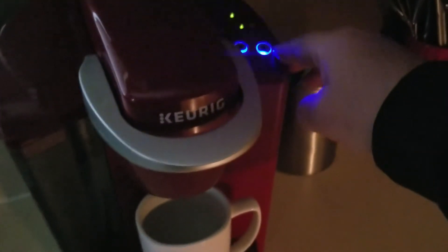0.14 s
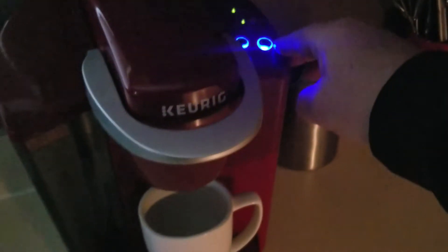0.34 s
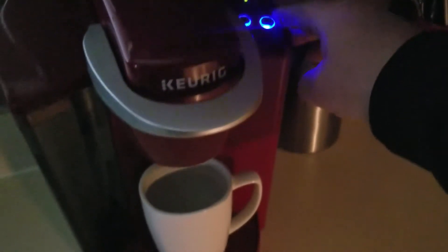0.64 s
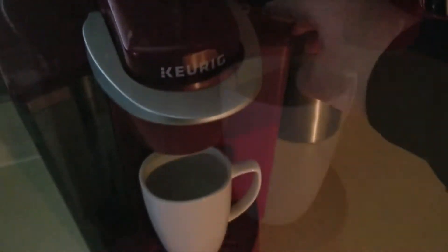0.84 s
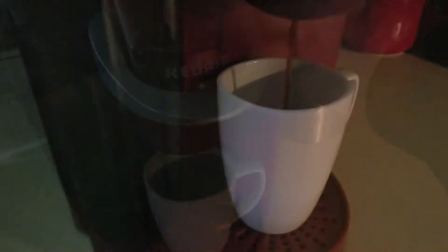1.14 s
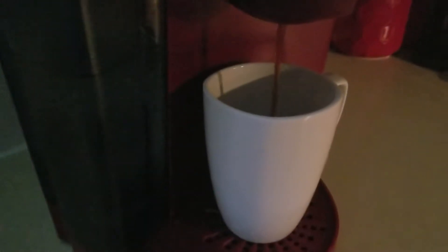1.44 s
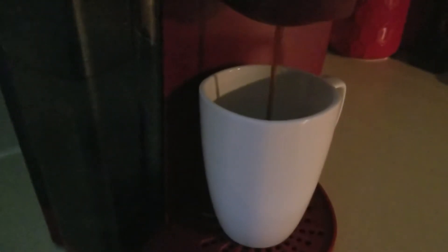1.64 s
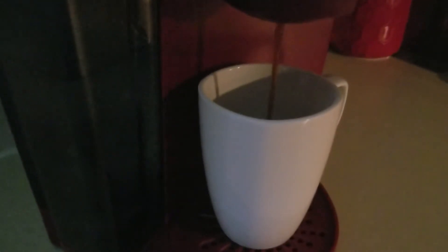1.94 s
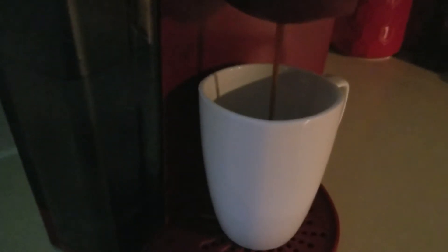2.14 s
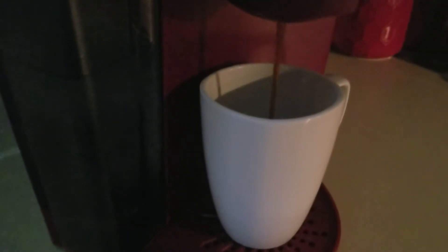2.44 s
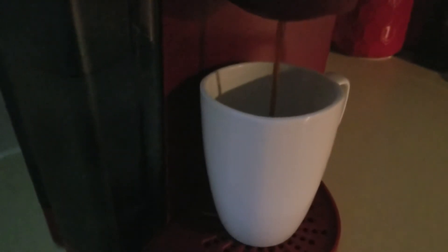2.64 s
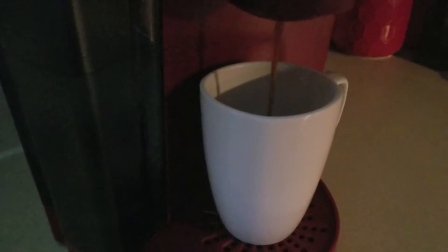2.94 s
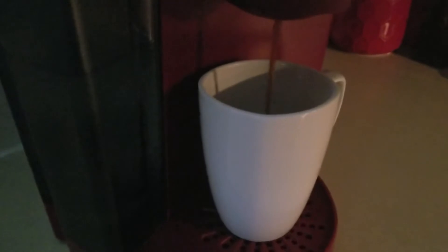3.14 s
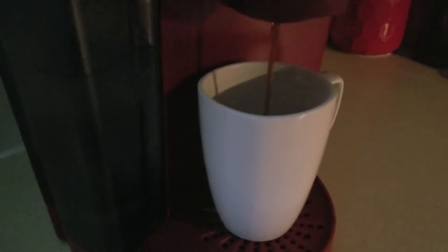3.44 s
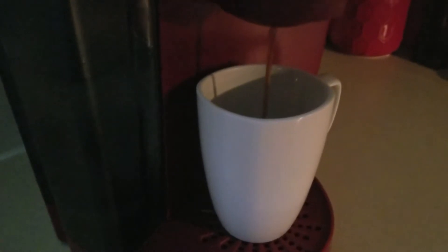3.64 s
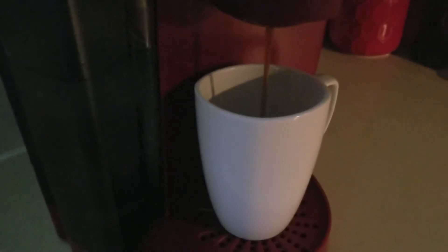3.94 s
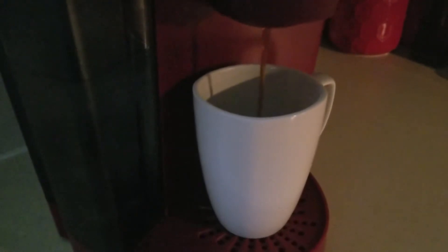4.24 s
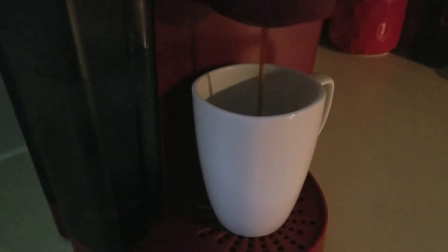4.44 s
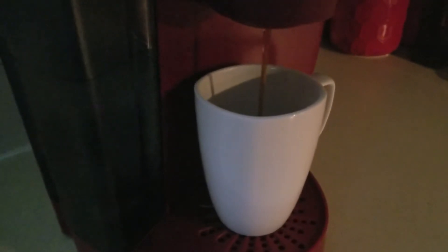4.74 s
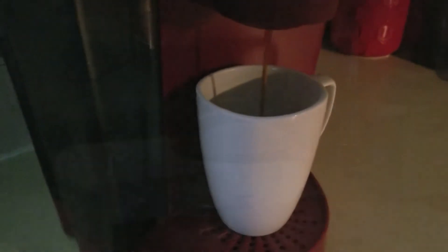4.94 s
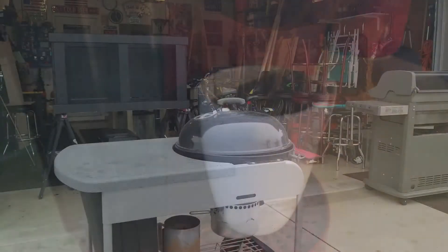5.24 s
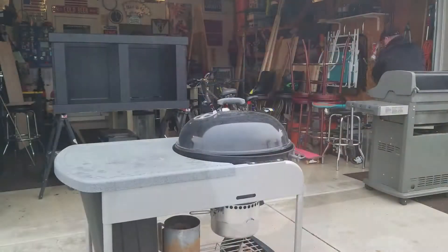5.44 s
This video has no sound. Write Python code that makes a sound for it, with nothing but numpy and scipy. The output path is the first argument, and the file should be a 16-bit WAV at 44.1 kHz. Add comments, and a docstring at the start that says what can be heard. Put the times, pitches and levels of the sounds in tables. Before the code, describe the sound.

Quiet room rumble and faint electrical hum come first. Then a buzzy pump drone fades in with a close, wet trickle, hollow bubbles and crisp irregular drops in a mug. The stereo pickup has short kitchen reflections. After five seconds everything thins out into outdoor air, a tiny bird-like twitter and a muffled bump.

```python
"""A thin stream of coffee fills a ceramic mug: splash noise, ringing air bubbles and drops ticking on the mug.
The coffee maker's pump is random knocks through casing resonances, plus a wandering sine drone.
Behind them lie low room rumble and hum, made of shaped noise and sines, heard by two close microphones.
At the end the pour fades and open air swells in, with a faint high twitter and a soft low bump."""
import sys
import numpy as np
from scipy import signal
from scipy.fft import rfft, irfft
from scipy.io import wavfile
from scipy.ndimage import uniform_filter1d

SR = 44100
rng = np.random.default_rng(int(sys.argv[2]) if len(sys.argv) > 2 else 0)


def write(x):
    x = np.atleast_2d(x).T
    wavfile.write(sys.argv[1], SR, np.round(np.clip(x, -1, 1) * 32767).astype(np.int16))


N = 246959
T = np.arange(N) / SR  # time of every sample, in seconds

# Kitchen background, shape only: pitch_hz, relative_level_db (per Hz)
KITCHEN_SPECTRUM = [(20, -38), (33, -15), (48, -8.5), (62, -6), (80, -16.5), (112, -12), (165, -28.5),
                    (238, -17), (300, -39.5), (400, -39), (750, -44.5), (1100, -49.5), (6000, -54),
                    (16000, -53)]
# Steady kitchen hum: pitch_hz, level_db
KITCHEN_HUM = [(59.4, -63), (296.5, -77.5), (855, -90.5)]
KITCHEN_NOISE_DB, KITCHEN_T60_S = -59.5, .31  # noise level; time for echoes to fall 60 dB
# Open air, shape only: pitch_hz, relative_level_db (per Hz)
OPEN_AIR_SPECTRUM = [(20, -32), (50, -27), (90, 7), (200, -13), (400, -20), (1000, -30), (2600, -42),
                     (4000, -28.5), (8000, -40.5), (16000, -73)]
# Swell of the open air: time_s, level_db
OPEN_AIR_SWELL = [(4.9, -100), (5.2, -57), (5.51, -55.5), (5.565, -49.5), (5.6, -38.5)]

# Pump level, which fades in, dips briefly near 2.4 and 4.1 s, and fades out: time_s, relative_level_db
PUMP_LEVEL = [(0.87, -57.5), (1.14, -49), (1.18, -40), (2.34, -39), (2.36, -45.5), (2.48, -40),
              (2.98, -38.5), (3.29, -35.5), (3.33, -36.5), (4.06, -38.5), (4.11, -45.5), (4.15, -37),
              (5.19, -40.5), (5.43, -51), (5.54, -68)]
# Casing resonances: pitch_hz, width_hz (before scaling in pump), relative_level_db
CASING_RESONANCES = [(52.3, 20, -16), (104, 7, -3), (147.3, 10, -11), (212, 23, -7), (239, 19, -2.5),
                     (293, 41, -4.5), (306.3, 3.8, 5.5), (373.7, 23.4, -11.5), (492.4, 48, -18.5),
                     (604.4, 49, -14)]
# The pump throbs with its uneven strokes, and its level flutters at random
STROKES_PER_S, STROKE_DB = 10.3, 1.5
FLUTTER_STEPS_PER_S, FLUTTER_DB = 8.834, 2.9

# The stream hitting the coffee: time_s, flow_db (relative), fine_spray_db (relative to the flow)
POUR_FLOW = [(0.84, -73, -11), (0.89, -68.5, -1), (1.02, -58.5, 1), (1.17, -52.5, 1), (1.26, -50, -3),
             (1.4, -49.5, -0.5), (1.93, -48.5, -1.5), (2.38, -47, -0.5), (2.73, -48, -3.5), (3.81, -47, -7),
             (4.9, -49, -1.5), (5.16, -53.5, -4.5), (5.35, -60, 0.5), (5.52, -70.5, -4)]
# Splash heard from the mug's mouth, shape only: pitch_hz, relative_level_db
SPLASH_SPECTRUM = [(430, -11), (680, -9.5), (860, 0.5), (1250, -0.5), (1650, -9), (2300, -5.5), (3200, -5),
                   (4500, -12), (5200, -15), (6800, -9), (7700, -20), (8800, -26.5), (9700, -18.5),
                   (16000, -24)]
# Loud drops on the mug: start_s, relative_peak_db, treble_db (relative), low_ring_db (relative)
LOUD_DROPS = [(0.8365, -47.5, -3, -6), (0.9502, -34.5, -14, -11), (1.035, -33.5, -7, -18),
              (1.1583, -26, -17, -34), (1.244, -29, -29, -8), (1.3039, -26.5, -15, -14),
              (1.3812, -31, -16, -9), (1.4281, -22.5, -15, -10), (1.577, -28, -3, -6),
              (1.6258, -18.5, -2.5, -23), (1.706, -24.5, -6, -6), (1.7965, -20.5, -5.5, -7),
              (1.8736, -19, -16, -6.5), (2.0216, -30, -4, -18), (2.0646, -20.5, -2.5, -25),
              (2.248, -17, 7, -10), (2.269, -25, -19, -4), (2.2882, -28, -11, -16), (2.4624, -26, -7, -20),
              (2.8464, -24, -11, -29), (3.1057, -14, -7, -14.5), (3.2168, -24.5, -13, -20),
              (3.245, -22, -29, -28), (3.26, -19, -24, -17.5), (3.471, -25, -18, 0),
              (3.5816, -29.5, -24, -17), (3.7313, -23.5, -21, -18), (3.8092, -29.5, -34, -30),
              (3.9903, -29.5, -5, -1), (4.0423, -21.5, -18, -1), (4.7212, -29.5, -8, -29),
              (4.7865, -29, -10, -22), (5.014, -30.5, -12, -32), (5.24, -29, -1, -32)]
# What a drop rings with, before small random changes: pitch_hz, t60_s, relative_level_db
MUG_MODES = [(2630, 0.055, -3.5), (3102, 0.065, -8.5), (4083, 0.017, 9), (4480, 0.024, 15),
             (6460, 0.088, -11), (6656, 0.018, 4), (6983, 0.037, -3), (6930, 0.0067, -6),
             (9910, 0.0057, 13.5), (10550, 0.0051, 7), (11870, 0.03, -8.5), (12310, 0.013, 2.5),
             (12100, 0.0065, -10), (15000, 0.0035, -24)]
# Gulps of air trapped by the stream: start_s, relative_peak_db, pitch_hz (nominal), upper_ring_db (relative)
AIR_GULPS = [(0.954, -43.5, 820, -12), (1.017, -32.5, 790, -26), (1.038, -34.5, 890, -29),
             (1.06, -27.5, 880, -31), (1.092, -33, 1320, -13), (1.113, -39, 910, 8.5),
             (1.194, -28, 1035, -14), (1.268, -25.5, 1100, -18), (1.399, -30.5, 920, -12),
             (1.427, -28, 1070, -18), (1.439, -29, 840, -17), (1.546, -29.5, 856, -12),
             (1.578, -28, 977, -8), (1.627, -22, 1040, -14), (1.753, -30.5, 886, -24),
             (1.798, -20.5, 951, -18), (1.829, -23.5, 1114, -19), (1.875, -34, 1210, -3),
             (1.997, -20, 967, -8), (2.022, -31, 837, -17), (2.066, -28.5, 866, -1),
             (2.091, -32.5, 760, -27), (2.227, -36.5, 1010, 3.5), (2.27, -27, 966, -1.5),
             (2.348, -28.5, 1170, -18), (2.585, -24.5, 965, -20), (2.708, -25, 1010, -3.5),
             (2.738, -26.5, 1030, -7), (2.861, -28, 1020, -26), (3.107, -26.5, 910, -17),
             (3.125, -25.5, 886, -30), (3.143, -24, 964, -33), (3.16, -27.5, 874, -17),
             (3.225, -27.5, 860, -6), (3.559, -21, 850, -38), (3.731, -25, 1070, -11.5),
             (3.813, -27.5, 850, -4.5), (3.909, -27, 1110, -18), (4.073, -29, 846, -5.5),
             (4.244, -28, 900, -16), (4.295, -35.5, 926, 0.5), (4.357, -31, 980, -22),
             (4.942, -31.5, 837, -14), (4.975, -30, 860, -26), (5.162, -29.5, 870, -40),
             (5.379, -41.5, 935, -33)]
# A gulp's upper ring steps down from about 4 kHz to 3 kHz shortly after 2 s: time_s, pitch_hz (nominal)
UPPER_RING_PITCH = [(2.07, 4150), (2.22, 2966)]
# Tone filter that makes the right microphone duller: pitch_hz, gain_db
RIGHT_MIC_SHADE = [(500, -13), (860, -7.5), (1500, 2.5), (3000, -5.5), (4600, 0.5), (5700, -10.5),
                   (6900, -22), (8500, -10), (10400, -14), (12600, -30.5), (16000, -33)]


def undb(db):
    """Turn decibels into a plain gain."""
    return 10 ** (np.asarray(db) / 20)


def unit(x):
    """Scale a sound to an average strength (rms) of 1."""
    return x / np.sqrt(np.mean(x ** 2))


def curve(rows, axis=1):
    """Read one column of a time table at every sample."""
    rows = np.array(rows)
    return np.interp(T, rows[:, 0], rows[:, axis])


def fade(rows):
    """Gain of a level curve, ramped to silence within 36 ms outside its span."""
    inside_s = np.minimum(T - rows[0][0], rows[-1][0] - T)
    return undb(curve(rows)) * np.clip(inside_s / 0.036 + 1, 0, 1)


def walk(rate):
    """Smooth random wandering with an rms of 1, from `rate` random steps a second."""
    k = int(SR / rate)
    steps = np.repeat(rng.standard_normal(N // k + 1), k)
    return unit(uniform_filter1d(uniform_filter1d(steps, k), k)[:N])


def colour(x, points, size=2048):
    """Filter through (pitch_hz, gain_db) points without any sound coming early."""
    hz, db = np.transpose(points)
    log_hz = np.log(np.fft.rfftfreq(size, 1 / SR) + 1)
    gain = undb(np.interp(log_hz, np.log(hz), db))
    # folding the cepstrum puts the filter's energy as early as possible
    cepstrum = irfft(np.log(gain))
    cepstrum[1:size // 2] *= 2
    cepstrum[size // 2 + 1:] = 0
    return signal.fftconvolve(x, irfft(np.exp(rfft(cepstrum))))[:N]


def resonate(x, hz, width):
    """Pass a sound through one resonance, with gain 1 at its centre."""
    return signal.lfilter(*signal.iirpeak(hz, hz / width, fs=SR), x)


def decay(t, t60):
    """Die away by 60 dB in t60 seconds."""
    return np.exp(-np.log(1000) * t / t60)


def delay(x, seconds):
    """Move a sound a little later; its last bit wraps round to the start."""
    return np.roll(x, int(round(seconds * SR)))


def add(track, s, sound):
    """Mix a short sound in at time s."""
    i = int(np.clip(s * SR, 0, N - 1))
    track[i:i + len(sound)] += sound[:N - i]


def impacts(rate, spread_db):
    """Random clicks, mostly small and now and then large, about `rate` a second."""
    out = np.zeros(N)
    when = np.flatnonzero(rng.random(N) < rate / SR)
    size = rng.standard_exponential(N, dtype=np.float32)[when]
    sign = rng.integers(2, size=N, dtype=np.int8)[when] * 2 - 1
    out[when] = sign * undb(spread_db * np.minimum(size, 5))
    return out


def air(points):
    """Background noise: the bass is shared by both microphones, the hiss largely is not."""
    shared, apart = rng.standard_normal((2, N))
    side = colour(apart, [(100, -16), (400, -10), (1500, 0)])
    return np.array([unit(colour(shared + sign * side, points, size=8192)) for sign in (1, -1)])


def kitchen():
    """Low room rumble from shaped noise, with the hum of a mains motor from steady sines."""
    hum = sum(undb(db) * unit(np.sin(2 * np.pi * (hz * T + rng.random()))) for hz, db in KITCHEN_HUM)
    left_right = undb(np.array([[.9], [-.9]]))
    return (undb(KITCHEN_NOISE_DB) * air(KITCHEN_SPECTRUM) + hum) * left_right


def outdoors():
    """Shaped noise swells in, with a thin falling twitter, perhaps a bird, and a soft low bump."""
    pitch_hz = np.interp(T, [5.52, 5.58], [4150, 3700])
    lowpass = signal.butter(2, 380, fs=SR, output="sos")
    rasp = unit(signal.sosfilt(lowpass, rng.standard_normal((2, N))))
    whistle = np.sin(2 * np.pi * np.cumsum(pitch_hz) / SR)
    twitter = undb(-58.5) * rasp * whistle * np.clip((T - 5.517) / .008, 0, 1)
    thud_noise = colour(rng.standard_normal(N), [(220, 5), (400, -15), (900, -11), (2000, -42)])
    thud = np.sin(2 * np.pi * 105 * T) + 0.52 * unit(thud_noise)
    bump = np.zeros(N)
    add(bump, 5.571, undb(-32) * thud * decay(T, 0.11) * (1 - np.exp(-T / 0.0023)))
    return air(OPEN_AIR_SPECTRUM) * fade(OPEN_AIR_SWELL) + twitter + bump


def pump():
    """Uneven pump knocks rattle the casing; a drone near its strongest resonance throbs and flutters."""
    steady_level = fade(PUMP_LEVEL)
    stroke_rate = STROKES_PER_S * (1 + .25 * walk(rate=12))
    stroke = np.sin(2 * np.pi * np.cumsum(stroke_rate) / SR)
    flutter = np.minimum(walk(rate=FLUTTER_STEPS_PER_S), 1)
    throbbing_level = steady_level * undb(STROKE_DB * stroke + FLUTTER_DB * flutter)
    knocks = impacts(rate=1500, spread_db=1.63)
    rattle = np.zeros(N)
    for hz, width, db in CASING_RESONANCES:
        # each panel is shaken at its own moments; two stages give it steep flanks
        shaken = np.roll(knocks, rng.integers(N))
        rattle += undb(db) * resonate(resonate(shaken, hz, width * 0.89), hz, width * 4)
    # dividing by a power of its own short-term strength keeps the rattle fairly even
    power = uniform_filter1d(rattle ** 2, int(.12 * SR))
    rattle = rattle / (power + 1e-12) ** .3
    # the drone's pitch wanders at random, slowly and quickly
    drone_hz = 303 + 4 * walk(rate=16) + 7 * walk(rate=60)
    drone = unit(np.sin(2 * np.pi * np.cumsum(drone_hz) / SR) * undb(3.4 * walk(rate=73)))
    rattle = unit(rattle) * (0.72 * steady_level + .6 * throbbing_level)
    sound = undb(-0.7) * drone * throbbing_level + undb(-4.5) * rattle
    return np.array([sound, delay(sound, 0.0002)]) * undb(np.array([[1.5], [-1.5]]))


def reflections(x, room_db, room_t60):
    """The counter, the walls and the cupboards return a short, duller tail: fading, softened noise."""
    t = np.arange(int(.5 * SR)) / SR
    dull_noise = signal.lfilter([1], [1, -.6], rng.standard_normal(len(t)))
    response = dull_noise * decay(t, room_t60) * (t > .003)
    return undb(room_db) * signal.fftconvolve(x, response / np.linalg.norm(response))[:N]


def splash():
    """The stream breaks into countless tiny impacts; the finest spray fizzes lower from just after 2 s."""
    body_hits = impacts(rate=3200, spread_db=2.5) * undb(1.6 * walk(rate=35))
    body = unit(colour(body_hits, SPLASH_SPECTRUM))
    fizz = impacts(rate=5500, spread_db=4.0) * undb(2.6 * walk(rate=19))
    high, lower = (unit(resonate(resonate(fizz, hz, 1900), hz, 2900)) for hz in (12700, 11600))
    blend = np.clip((T - 2.1) / 0.56, 0, 1)  # crossfade from the high fizz to the lower one
    spray = ((1 - blend) * high + undb(-2.5) * blend * lower) * undb(curve(POUR_FLOW, axis=2))
    return (undb(6.5) * body + undb(1.95) * spray) * fade(POUR_FLOW)


def tick(top_db, low_db, s):
    """A drop at time s: a tiny noise crack and ringing mug modes, those near 4 kHz weaker after 2 s."""
    t = np.arange(int(.035 * SR)) / SR
    hz, t60, db = np.transpose(MUG_MODES)[:, :, None]
    # every drop excites its own mix of modes
    detune, weight, phase = rng.standard_normal((3, len(MUG_MODES), 1))
    weaker_db = np.interp(s, np.transpose(UPPER_RING_PITCH)[0], [0, -9]) * (hz > 3600) * (hz < 5200)
    gain = undb(db + weaker_db + 2 * weight + (hz > 10000) * (top_db + 12) + (hz < 5200) * low_db)
    modes = np.sin(2 * np.pi * (hz * (1 + .016 * detune) * t + phase))
    ring = np.sum(gain * decay(t, t60) * modes, axis=0)
    tone = [(700, -14), (3000, low_db + 1.5), (5000, -12.5), (6700, 5.5), (8200, -10.5), (9600, -7.5),
            (12800, top_db + 10), (16000, top_db + 2)]
    crack = colour(rng.standard_normal(len(t)) * decay(t, 0.016), tone, size=512)[:len(t)]
    sound = (unit(ring) + undb(-1.5) * unit(crack)) * (1 - np.exp(-(t / .0013) ** 2))
    return sound / np.abs(sound).max()


def drops():
    """Drops tick on the mug: loud ones at set times, and a faint random patter that follows the spray."""
    loud, faint = np.zeros(N), np.zeros(N)
    for s, peak_db, top_db, low_db in LOUD_DROPS:
        add(loud, s - .0005, undb(peak_db) * tick(top_db, low_db, s))
    for when, size, top, low in rng.random((200, 4)):
        s = when * N / SR
        add(faint, s, undb(-17 * size ** 0.63) * tick(-3 - 16 * top, -3 - 14 * low, s))
    spray_gain = fade(POUR_FLOW) * undb(curve(POUR_FLOW, axis=2))
    return undb(5.0) * loud + undb(25) * faint * spray_gain


def bubble(hz, cycles, glide):
    """A pocket of air rings and dies away; its pitch climbs if glide is positive, falls if negative."""
    t = np.arange(int(.05 * SR)) / SR
    age = t * hz / cycles  # reaches 1 when the ring has fallen by 60 dB
    pitch_hz = hz * (1 + glide * (np.minimum(age, 1) - .15))
    ring = np.sin(2 * np.pi * np.cumsum(pitch_hz) / SR)
    ring = ring * decay(age, 1) * (1 - np.exp(-(age / 0.077) ** 2))
    return ring / np.abs(ring).max()


def noise_burst(hz, width, t60, rise_s):
    """A short resonant puff of noise that rises quickly and dies away."""
    t = np.arange(int(.04 * SR)) / SR
    return resonate(rng.standard_normal(len(t)), hz, width) * decay(t, t60) * (1 - np.exp(-t / rise_s))


def bubbles():
    """Large gulps ring with a pop, a fleck of spray and a splat; small bubbles simmer with the flow."""
    large, small = np.zeros(N), np.zeros(N)
    for s, db, hz, upper_db in AIR_GULPS:
        upper_hz = np.interp(s, *np.transpose(UPPER_RING_PITCH))
        pop = noise_burst(1.33 * hz, 1400, t60=0.023, rise_s=0.0017)
        splat = noise_burst(0.87 * upper_hz, 1060, t60=0.037, rise_s=0.0018)
        add(large, s - .001, undb(db) * bubble(hz, cycles=19 * (hz / 1000) ** 0.19, glide=-0.37))
        add(large, s - .002, undb(db + 1.5) * pop)
        add(large, s - .001, undb(db - 12.5) * tick(top_db=-9, low_db=-10, s=s))  # fleck of spray
        add(large, s, undb(db + upper_db + 1.5) * bubble(upper_hz, cycles=53, glide=-0.09))
        add(large, s - .001, undb(db + upper_db + 7.5) * splat)
    for when, pitch, size, glide in rng.random((600, 4)):
        # most are wide and low; the small high ones ring for more cycles
        hz = 790 * 6.2 ** (pitch ** 2.1)
        ring = bubble(hz, cycles=17 * (hz / 1000) ** .55, glide=0.29 * (glide - .5))
        add(small, when * N / SR, undb(-23 * size ** .5) * (hz / 1000) ** -.45 * ring)
    return undb(2.5) * large + undb(22.5) * small * fade(POUR_FLOW)


def mug():
    """Air in the mug rings along with the pour; the right microphone hears it slightly later and duller."""
    plops = bubbles() + drops()
    wash = splash()
    left = plops + wash
    # the splash is spread over the surface, so only part of it is alike at both microphones
    right = delay(undb(2.1) * plops + 0.15 * wash, 0.00029) + 0.75 * splash()
    left, right = (x + undb(-3) * resonate(x, 827.5, 44) for x in (left, right))
    left = left + reflections(left, room_db=-11.5, room_t60=KITCHEN_T60_S)
    right = right + reflections(right, room_db=-12.0, room_t60=KITCHEN_T60_S)
    return np.array([left, colour(right, RIGHT_MIC_SHADE)])


def scene():
    """Pump and pour over the kitchen, with open air swelling in at the end."""
    return pump() + mug() + kitchen() + outdoors()


def record(dry):
    """A steep low-pass filter cuts the top of the treble, above 15750 Hz."""
    return signal.sosfilt(signal.ellip(8, .2, 70, 15750, fs=SR, output="sos"), dry)


dry = scene()
out = record(dry)
write(out)
```